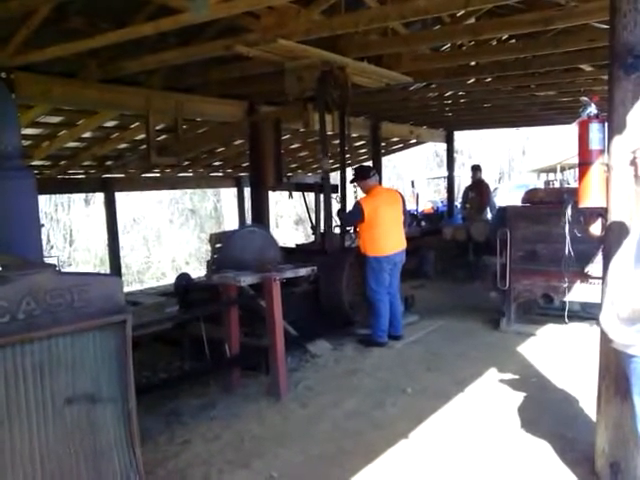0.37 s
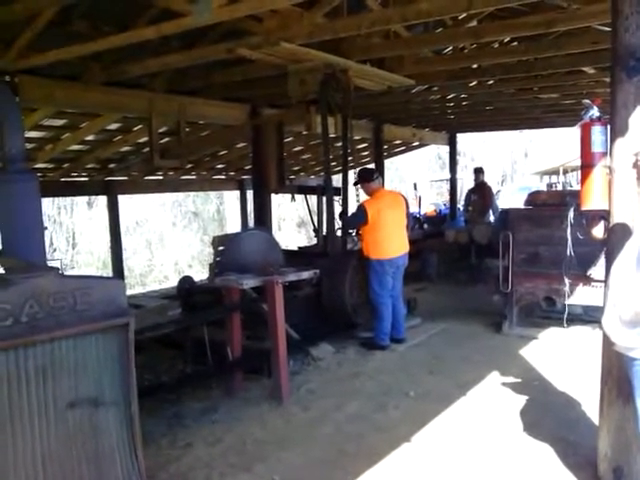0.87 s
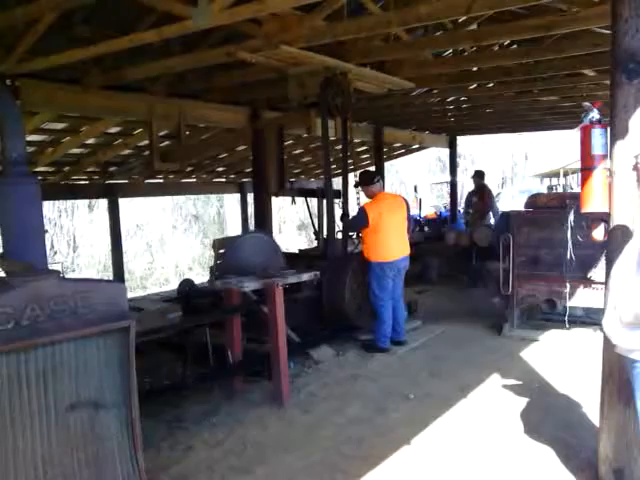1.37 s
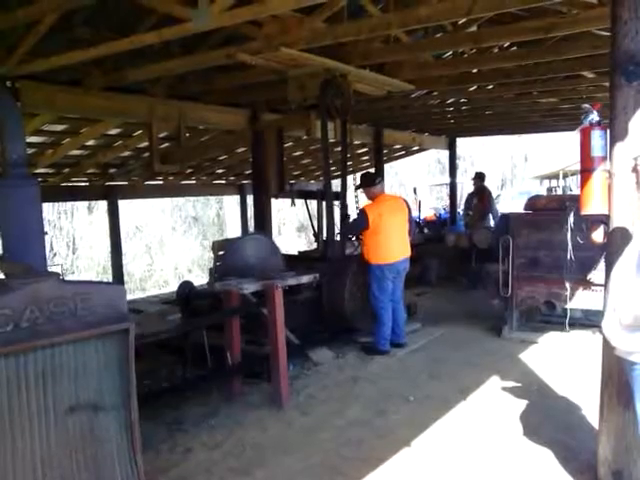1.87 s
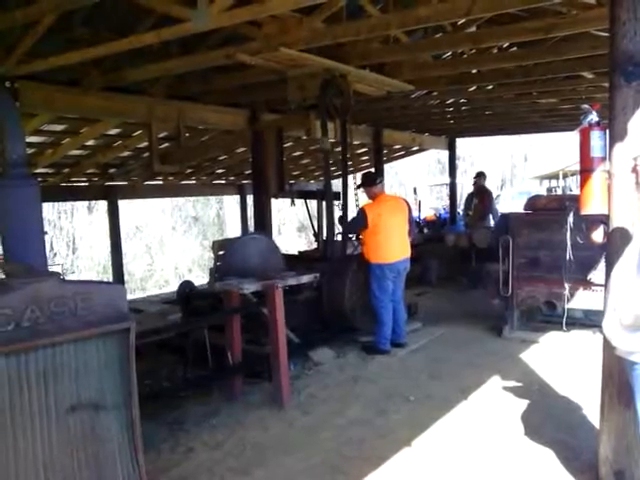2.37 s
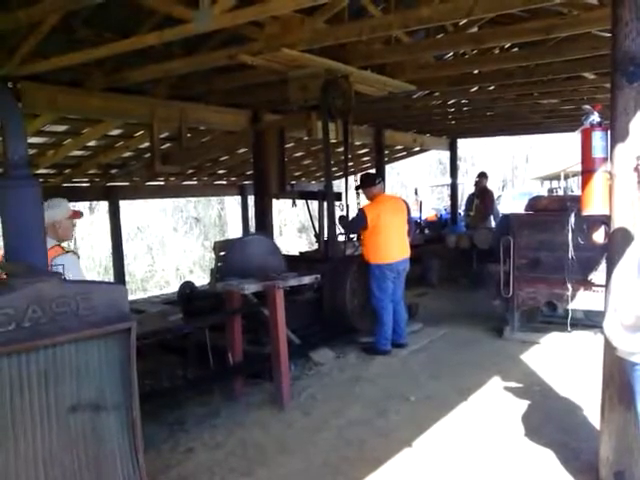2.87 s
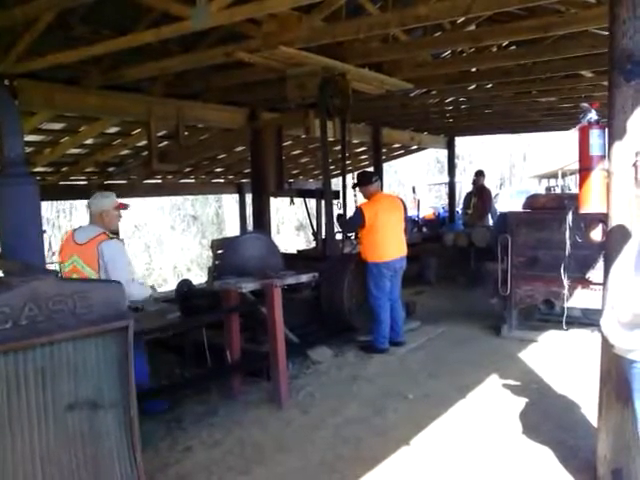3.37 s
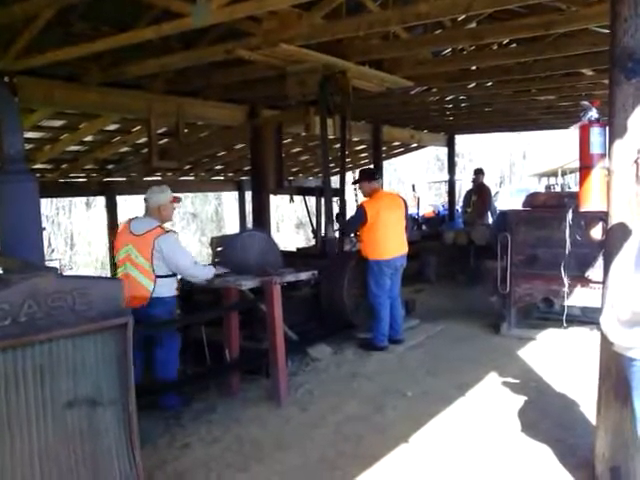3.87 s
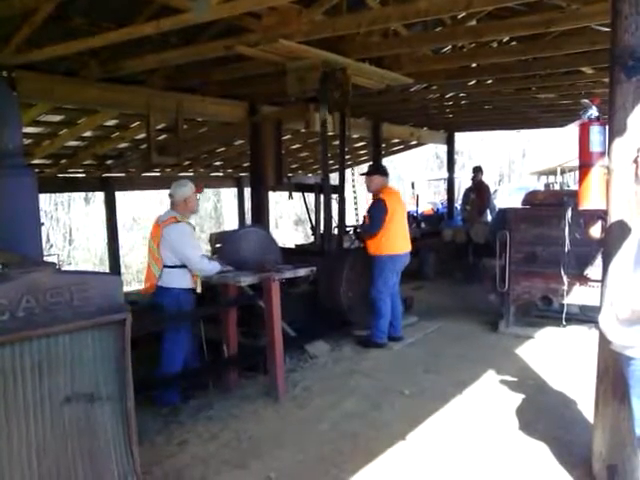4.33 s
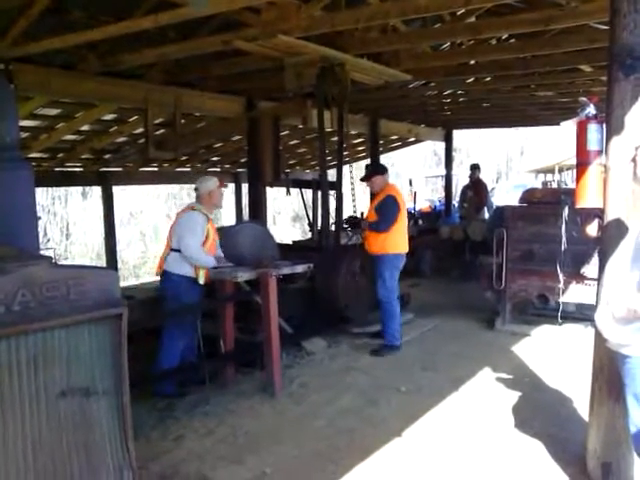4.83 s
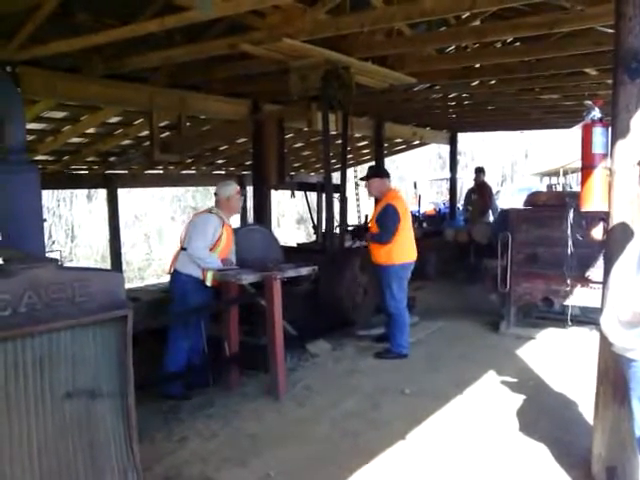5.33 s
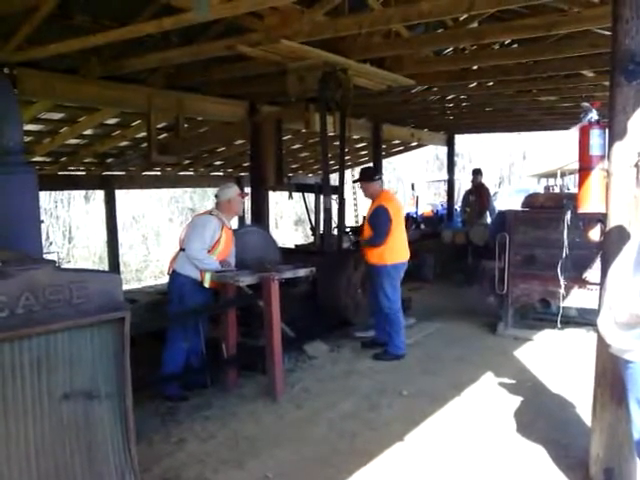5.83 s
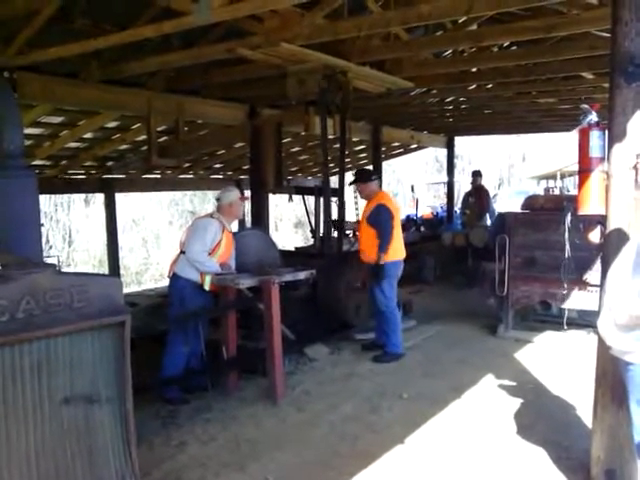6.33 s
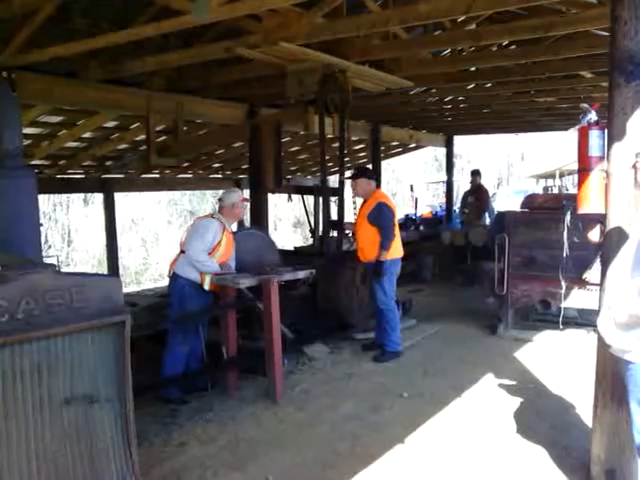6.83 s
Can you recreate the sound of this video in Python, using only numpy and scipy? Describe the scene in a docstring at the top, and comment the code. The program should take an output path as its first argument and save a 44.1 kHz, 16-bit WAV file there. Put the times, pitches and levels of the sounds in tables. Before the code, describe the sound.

A continuous loud engine and machinery din fills the clip. Rapid random rattling rings in a nasal upper midrange over lumpy low rumble and a swelling engine drone. Brief surges and tiny dips keep it throbbing unevenly, without any clear pause. The cheap microphone squeezes everything into a narrow band and distorts, spitting crackly clicks on the loudest bursts.

```python
"""A dense, buzzing clatter roars; an old engine hums below it. Clatter: sparse random pulses with a short
buzzing echo pass through drifting resonances and throb in level. Hum: a few sine harmonics of the engine's
firing rate waver and swell together. Loudest peaks: the pulse response of the overall colour, added onto crests
of the limited roar. All is confined to a narrow, telephone-like band; its loudest peaks clip and click into the
treble."""
import sys
import numpy as np
from scipy import signal
from scipy.io import wavfile
from scipy.ndimage import minimum_filter1d, map_coordinates

SR = 44100
rng = np.random.default_rng(int(sys.argv[2]) if len(sys.argv) > 2 else 0)


def file_out(sig):
    """Save sig as 16-bit WAV at sys.argv[1]."""
    # one column per channel
    cols = np.atleast_2d(sig).T
    # limit, then scale
    lim = np.clip(cols, -1, 1)
    pcm = np.round(lim * 32767).astype(np.int16)
    wavfile.write(sys.argv[1], SR, pcm)


def elevation(decibels):
    """Turn decibel levels (scalar or array-like) into linear amplitude ratios."""
    levels = np.asarray(decibels, float)
    return 10 ** (levels / 20)


N = 306936  # samples


def evened(x):
    """Normalization: scales a signal to rms 1."""
    return x / np.sqrt(np.mean(x ** 2) + 1e-20)


def wander(hz):
    """Band-limited noise: a spline through random points, hz of them a second, of rms about 1."""
    points = rng.standard_normal(400)
    return map_coordinates(points, [np.arange(N) * hz / SR], order=3, mode="wrap")


def control(table, axis):
    """Linear interpolation: one column of a table, sample by sample."""
    columns = np.transpose(table)
    return np.interp(np.arange(N) / SR, columns[0], columns[axis])


def bumps(table, axis):
    """Superposition: sums raised-cosine humps, one per row (centre [s], half length [s], ..)."""
    t = np.arange(0, N + 64, 64) / SR
    db = np.zeros(len(t))
    for row in table:
        phase = np.clip((t - row[0]) / max(row[1], .01), -1, 1)
        db += row[axis] * np.cos(np.pi / 2 * phase) ** 2
    return np.interp(np.arange(N) / SR, t, db)


def resonate(x, hz, width):
    """Heterodyne resonance: shifts hz to zero, smooths over width [Hz], shifts back; gain about 1 at the centre."""
    carrier = np.exp(2j * np.pi * np.cumsum(hz * np.ones(len(x))) / SR)
    decay = np.exp(-np.pi * width / SR)
    envelope = signal.lfilter([1 - decay], [1, -decay], x / carrier)
    return 2 * (carrier * envelope).real


# Overall colour of the sound with its narrow band: (frequency [Hz], level [dB])
OVERALL_COLOUR = [(12, -53), (20, -24), (38, -14), (77, -5), (113, -0.5), (164, -1.5), (425, -4.5),
                  (662, -5.5), (1200, -4.5), (1870, -1.5), (2290, -0.5), (2730, -7.5), (3120, -10),
                  (3330, -13.5), (3980, -32.5), (5170, -66.5), (8760, -120)]


def pulse_response():
    """Minimum phase: the causal response to one pulse that has the overall colour."""
    f, db = np.transpose(OVERALL_COLOUR)
    hz = abs(np.fft.fftfreq(8192, 1 / SR))
    level_db = np.interp(np.log(hz + 1), np.log(f + 1), db)
    log_gain = np.log(elevation(np.maximum(level_db, -100)))
    # the Hilbert transform of the log gain gives the phase
    spectrum = np.exp(np.conj(signal.hilbert(log_gain)))
    return np.fft.ifft(spectrum).real[:4096]


def feedback_echo(pulses, share=0.42, hold_s=.03):
    """Feedback echo: the crackle repeats, weaker, 2.5-18 ms later, giving a short buzzing flutter."""
    step, longest = 110, 800  # shortest and longest delay [samples]
    starts = np.arange(longest, N - step, step)
    held_delays = rng.uniform(step, longest, 2000).astype(int)
    delays = held_delays[(starts / SR / hold_s).astype(int)]  # each delay holds for hold_s
    out = pulses.copy()
    for a, delay in zip(starts, delays):
        out[a:a + step] += share * out[a - delay:a - delay + step]
    return out


# Slow drift of the clatter: (time [s], level [dB], centre of the high ringing [Hz])
CLATTER_DRIFT = [(0.0, -15, 2200), (0.11, -16, 1800), (0.15, -15.5, 2065), (0.91, -16.5, 1946),
                 (2.02, -16.5, 2041), (2.04, -17.5, 1920), (2.85, -16.5, 2080), (2.87, -15.5, 1937),
                 (3.55, -16, 2093), (4.81, -17, 1980), (5.0, -17.5, 1850), (5.95, -16, 1996),
                 (6.14, -15.5, 1940), (6.96, -16.5, 1937)]
# Surges of the clatter: (centre [s], half length [s], rise [dB], extra low ringing [dB], extra rumble [dB])
CLATTER_SURGES = [(0.01, 0.021, 4, -6, -6.5), (0.16, 0.033, 2.5, -7, 0), (0.205, 0.021, 1, -5, 4.5),
                  (0.269, 0.031, 4.5, 3.5, 0.5), (0.564, 0.053, 2.5, -1.5, 1), (0.629, 0.053, 4.5, 0, -2),
                  (0.858, 0.017, 2.5, -5.5, 2), (1.117, 0.053, 9, 0, 3), (1.197, 0.03, 5.5, 4.5, 6),
                  (1.282, 0.035, 4, 1.0, 1.5), (1.467, 0.03, 6, 3, 0.5), (1.911, 0.033, 2.5, 2, -3),
                  (2.135, 0.027, 5, 0.5, 0), (2.275, 0.035, 7, -2, -1.5), (2.38, 0.089, 2.0, -1.5, -3.5),
                  (2.429, 0.03, 2.5, 3.5, -2), (2.878, 0.03, 5, -3.5, 1), (3.023, 0.024, 4, -1.5, -1),
                  (3.288, 0.034, 1, -5.5, -7), (3.472, 0.03, 2.5, -1.5, 2), (3.976, 0.03, 2.5, 1, 1.5),
                  (4.106, 0.035, 4.5, -7.5, -4), (4.285, 0.03, 2, -3, 0), (4.37, 0.03, 6.5, -4.5, 0.5),
                  (4.639, 0.03, 4.5, 2, -3), (4.869, 0.094, 4, -1, -3), (5.188, 0.039, 5, 1, 4),
                  (5.418, 0.06, 5, 1.5, 0.5), (5.542, 0.038, 2.0, -0.5, -3), (5.707, 0.03, 5.5, -0.5, 0),
                  (5.857, 0.03, 3, -1.5, 0), (5.927, 0.023, 3.5, -1.0, 6), (5.981, 0.03, 2.5, -9, -2.5),
                  (6.281, 0.033, 2, 0.5, 6), (6.371, 0.037, 3.0, 2, 4), (6.934, 0.03, 1.5, -7, 0.5)]
# Brief dips of the clatter: (centre [s], half length [s], drop [dB])
CLATTER_LULLS = [(0.329, 0.019, 3.5), (0.469, 0.027, 5), (0.798, 0.021, 5), (1.237, 0.021, 7.5),
                 (1.327, 0.027, 1.5), (1.422, 0.032, 4), (1.611, 0.012, 3.5), (2.035, 0.14, 1.5),
                 (2.205, 0.013, 9), (3.542, 0.015, 4.5), (4.195, 0.028, 5.5), (4.47, 0.032, 2),
                 (4.859, 0.022, 3), (5.049, 0.076, 3), (5.093, 0.03, 6.5), (5.293, 0.024, 4),
                 (5.652, 0.03, 6), (6.231, 0.03, 3.5), (6.565, 0.025, 5.5)]
# Flares of the low ringing on its own: (centre [s], half length [s], rise [dB])
LOW_RING_FLARES = [(0.05, 0.03, 4.5), (1.038, 0.028, 2.5), (1.502, 0.065, 5.5), (1.886, 0.045, 6.5),
                   (3.203, 0.043, 5.5), (3.357, 0.054, 4), (3.821, 0.03, 3.5), (4.929, 0.03, 5.5),
                   (5.373, 0.036, 7), (5.507, 0.041, 2.5), (6.51, 0.026, 7.5), (6.77, 0.041, 6)]


def clatter():
    """Source-filter synthesis: sparse random pulses pass through drifting resonances, over a duller rumble."""
    # one pulse of either sign per slot, heights spread over 16.9 dB, on a bed of noise
    slot = 40  # samples
    at = np.arange(0, N - slot, slot)
    draws = rng.random((len(at), 3))
    pulses = 0.5 * rng.standard_normal(N) / np.sqrt(slot)
    places = at + (draws[:, 0] * slot).astype(int)
    pulses[places] += np.sign(draws[:, 1] - .5) * elevation(16.9 * draws[:, 2])
    pulses = feedback_echo(pulses) * elevation(1.48 * wander(hz=55.54))  # fast flutter shared by all bands

    low_db = bumps(CLATTER_SURGES, axis=3) + bumps(LOW_RING_FLARES, axis=2)
    rumble_db = bumps(CLATTER_SURGES, axis=4) + 2.4 * wander(hz=17)
    throb_db = bumps(CLATTER_SURGES, axis=2) - bumps(CLATTER_LULLS, axis=2)

    # each resonance wanders in pitch and in level
    high_hz = control(CLATTER_DRIFT, axis=2) + 170 * wander(hz=24.87)
    high = resonate(pulses, high_hz, 140) * elevation(3.0 + 2.9 * wander(hz=25.23))
    high += resonate(pulses, 1650 + 130 * wander(hz=18), 170) * elevation(-0.5 + 5.2 * wander(hz=16))
    high += resonate(pulses, 2450 + 150 * wander(hz=14), 190) * elevation(-2.5 + 3.0 * wander(hz=23))
    low = resonate(pulses, 680 + 90 * wander(hz=20), 260) * elevation(2.5 + 3.5 * wander(hz=22.096) + low_db)
    top = resonate(pulses, 3050 + 200 * wander(hz=20), 300) * elevation(-1.0 + 5.0 * wander(hz=22.4))
    top += resonate(pulses, 3900 + 250 * wander(hz=18), 500) * elevation(-0.4 + 5.2 * wander(hz=20.95))
    sound = signal.oaconvolve(pulses + high + low + top, pulse_response())[:N]

    rumble = signal.sosfilt(signal.butter(2, 380, fs=SR, output="sos"), sound)
    sound += rumble * (elevation(rumble_db) - 1)
    deep = signal.sosfilt(signal.butter(2, 95, fs=SR, output="sos"), sound)
    sound += deep * (elevation(-1.5 + 4.7 * wander(hz=11)) - 1)  # the deepest rumble comes in lumps
    return evened(sound) * elevation(control(CLATTER_DRIFT, axis=1) + throb_db)


# Engine orders: (multiple of the firing rate, relative level [dB])
ENGINE_ORDERS = [(3, -0.5), (4, -8), (5, -19), (6, -13.5), (7, -10.5)]
# Swells of the hum: (centre [s], half length [s], rise [dB])
HUM_SWELLS = [(0.015, 0.027, 10), (0.145, 0.15, 8.5), (0.269, 0.03, 12.5), (0.519, 0.027, 8.0),
              (0.663, 0.21, 9.0), (0.838, 0.03, 13), (0.938, 0.03, 8), (1.162, 0.15, 6.5),
              (1.207, 0.03, 5.5), (1.492, 0.055, 17), (1.671, 0.15, 12.5), (1.811, 0.03, 8.5),
              (2.375, 0.087, 13), (2.589, 0.03, 9), (2.674, 0.15, 4), (2.948, 0.073, 8.5),
              (3.163, 0.0295, 16), (3.352, 0.045, 16), (3.522, 0.03, 6), (3.816, 0.041, 10),
              (4.28, 0.027, 14.5), (4.664, 0.15, 6.5), (5.004, 0.045, 13), (5.178, 0.096, 12),
              (5.433, 0.15, 7), (5.617, 0.04, 12), (5.702, 0.035, 18), (5.907, 0.073, 13.0),
              (6.056, 0.027, 17), (6.206, 0.12, 6.5), (6.515, 0.039, 14), (6.62, 0.026, 9),
              (6.854, 0.15, 4)]


def hum():
    """Harmonic series: low orders of the firing rate, each wavering, all throbbing together."""
    firing_hz = 32.75  # mean rate
    base_db = -40  # mean level between the swells, before each order's own level
    turns = np.cumsum(firing_hz * (1 + .012 * wander(hz=4.5))) / SR
    orders = np.zeros(N)
    for k, db in ENGINE_ORDERS:
        level = elevation(db + 2.7 * wander(hz=7.5))
        orders += level * np.sin(2 * np.pi * (k * turns + rng.random()))
    return orders * elevation(base_db + bumps(HUM_SWELLS, axis=2) + 3.1 * wander(hz=16))


def limited(x):
    """Peak limiting: a fast, smoothed gain holds the ordinary peaks just under the clipping point."""
    allowed = np.minimum(.66 / (abs(x) + 1e-9), 1)
    lowest = minimum_filter1d(allowed, 121)
    gain_change = signal.oaconvolve(lowest - 1, np.hanning(121) / 60, "same")
    return x * gain_change + x


# Loudest peaks of the roar, which clip and click: (time [s], peak level before band limit and clipping [dB])
CLIPPED_PEAKS = [(0.0034, -0.4), (0.0053, -1.4), (0.0085, -0.7), (0.0122, -2.3), (0.0154, -2.1),
                 (0.1971, -1.1), (0.2022, -1.1), (0.2088, -1.3), (0.2105, -1.5), (0.2234, -1.5),
                 (0.2553, -2.4), (0.2622, -1.6), (0.2681, -1.6), (0.2701, -2.0), (0.2754, -1.8),
                 (0.2925, -0.3), (0.3025, -2.6), (0.5499, -1.6), (0.5555, -2.8), (0.6144, -1.2),
                 (0.6228, -1.3), (0.7718, -2.7), (0.8472, -2.4), (0.8556, -1.6), (0.8573, -1.3),
                 (0.86, -1.9), (1.0905, -2.4), (1.0977, -1.9), (1.1017, -1.7), (1.1039, -1.8),
                 (1.1063, -0.8), (1.1081, -1.6), (1.1121, -1.0), (1.1168, -2.2), (1.1205, -1.4),
                 (1.1234, -2.4), (1.1255, -1.4), (1.1298, -2.3), (1.1319, -0.8), (1.1985, -1.7),
                 (1.2049, -2.7), (1.4596, -1.6), (1.7366, -2.3), (1.7424, -2.3), (2.2649, -1.1),
                 (2.2672, -1.4), (2.2692, -2.5), (2.2839, -2.4), (2.2914, -2.7), (2.3399, -1.9),
                 (2.3724, -1.2), (2.4272, -2.0), (2.4326, -1.0), (2.4408, -1.5), (2.8711, -2.7),
                 (2.8759, -0.7), (2.8788, -1.4), (3.0159, -2.5), (3.0193, -2.1), (3.0259, -1.0),
                 (3.0344, -1.6), (3.2916, -2.0), (3.324, -1.9), (3.4731, -2.9), (3.476, -1.9),
                 (3.9109, -2.8), (3.9245, -1.6), (3.9691, -2.0), (3.984, -2.4), (4.0993, -0.6),
                 (4.103, -1.8), (4.1159, -1.7), (4.2792, -2.4), (4.2803, -0.3), (4.3826, -2.0),
                 (4.6341, -2.8), (4.6405, -1.1), (4.6502, -0.7), (4.7958, -2.6), (4.8301, -1.7),
                 (4.9145, -2.6), (4.9263, -2.6), (4.9324, -2.4), (4.9387, -2.3), (5.185, -1.9),
                 (5.192, -2.3), (5.4427, -2.6), (5.4451, -1.3), (5.615, -2.8), (5.6895, -1.9),
                 (5.6935, -2.0), (5.7003, -2.8), (5.7023, -2.8), (5.7044, -1.6), (5.7059, -1.7),
                 (5.7088, -1.7), (5.7111, -1.5), (5.8639, -2.8), (5.8661, -1.8), (5.9233, -1.7),
                 (5.9276, -1.9), (5.9785, -1.7), (5.9798, -1.4), (6.2632, -1.7), (6.2839, -1.9),
                 (6.2866, -2.6), (6.3051, -1.1), (6.3539, -2.9), (6.3625, -1.7), (6.7335, -2.5),
                 (6.7363, -2.6), (6.8516, -1.6), (6.9237, -2.4), (6.9298, -1.5)]


def loudest_peaks(steady):
    """Impulse response: a scaled pulse response lifts a crest of the roar to each peak, then rings out."""
    shape = pulse_response()
    shape = shape + 0.36 * resonate(shape, 2600, 500)
    top = abs(shape).argmax()
    lead = top + 8  # samples
    out = np.pad(steady, (lead, len(shape)))
    for s, peak_db in CLIPPED_PEAKS:
        start = round(s * SR)
        # the largest excursion within 8 samples of the given time
        start += abs(out[start + top:start + top + 17]).argmax()
        crest = out[start + top]
        missing = np.sign(crest) * elevation(peak_db) - crest
        out[start:start + len(shape)] += missing * shape / shape[top]
    return out[lead:lead + N]


def scene():
    """Superposition: clatter and hum, limited together, with the loudest peaks raised on top."""
    roar = limited(clatter() + hum())
    return loudest_peaks(roar)[None]


def roll_off(x):
    """The treble ends steeply here."""
    return signal.sosfilt(signal.butter(12, 15870, fs=SR, output="sos"), x)


def record(dry):
    """Band limiting to a telephone-like band, then hard clipping that crackles into the treble."""
    ceiling = .707  # amplitude of the clipping point
    band = signal.firwin(301, 4480, window=("kaiser", 10), fs=SR)
    narrow = signal.oaconvolve(dry, band[None], "same")
    mix = np.clip(narrow, -ceiling, ceiling)
    return roll_off(mix)


dry = scene()
out = record(dry)
file_out(out)
```